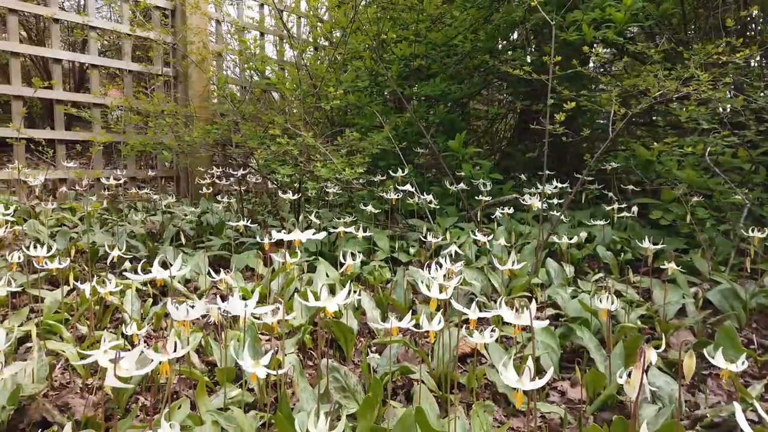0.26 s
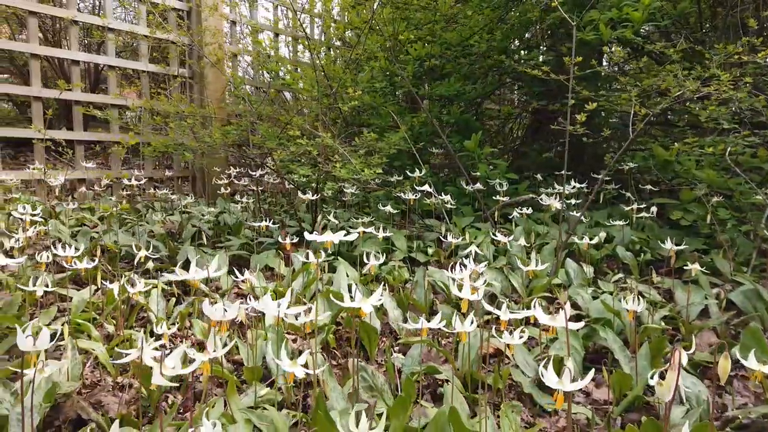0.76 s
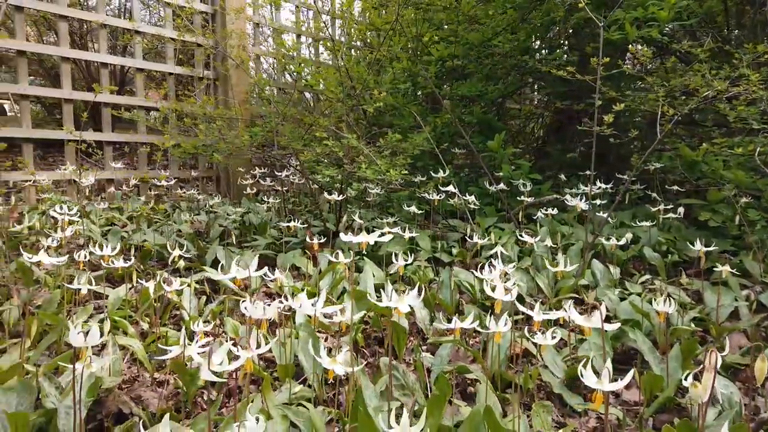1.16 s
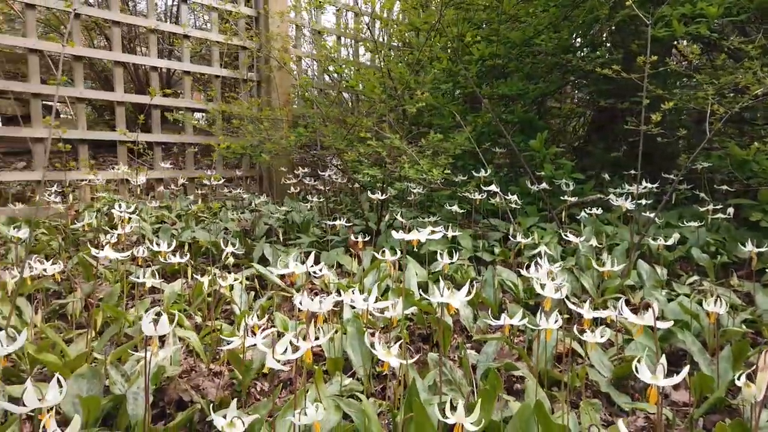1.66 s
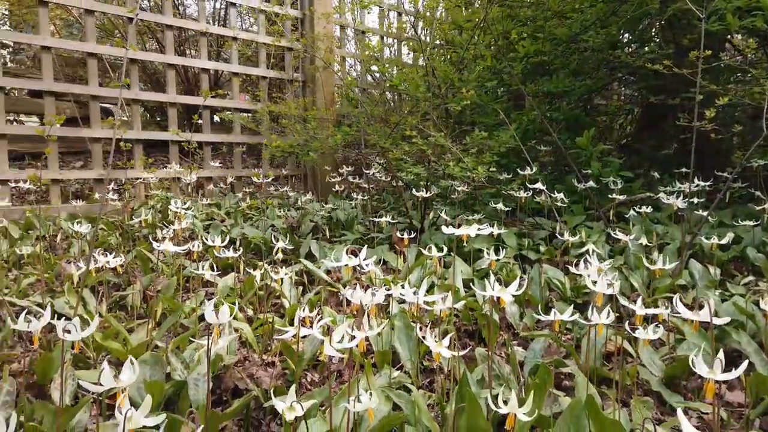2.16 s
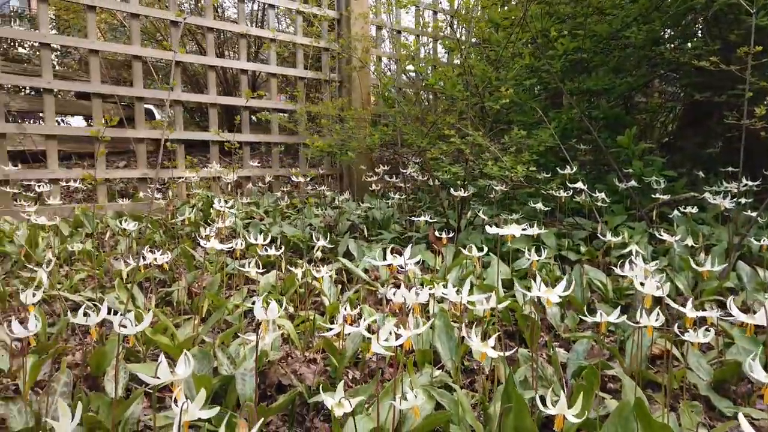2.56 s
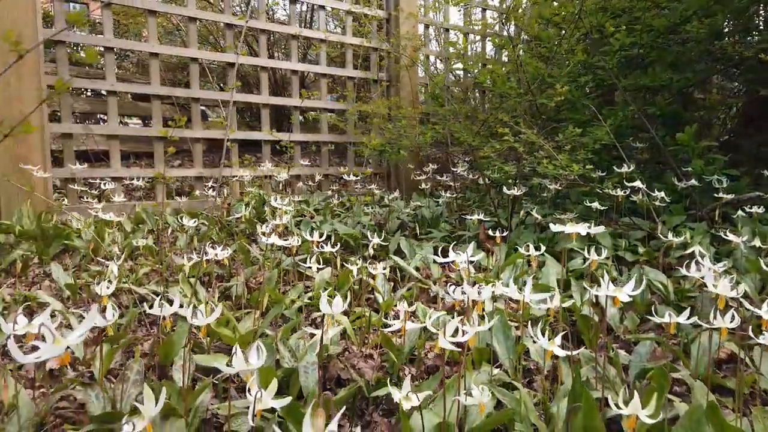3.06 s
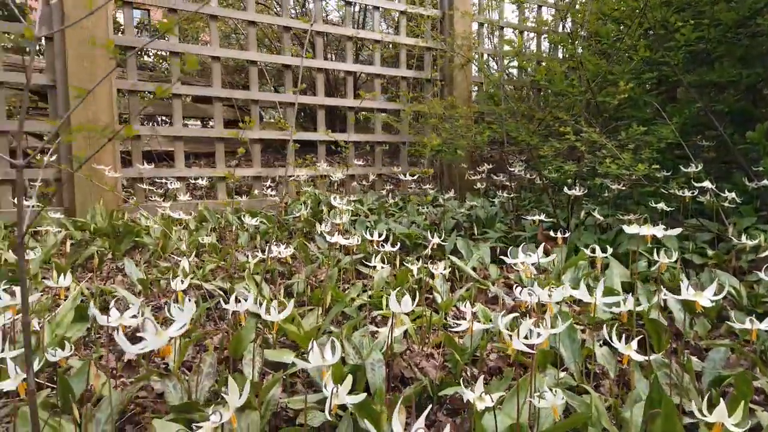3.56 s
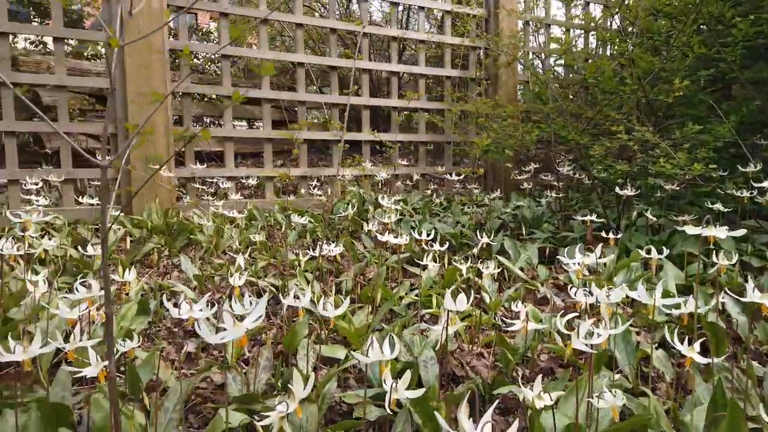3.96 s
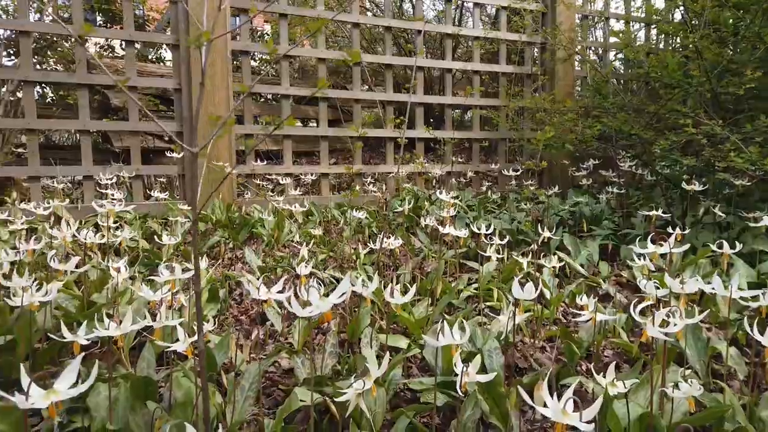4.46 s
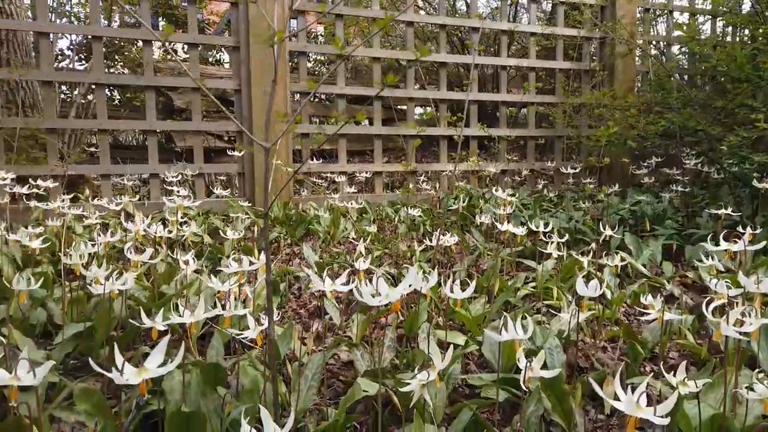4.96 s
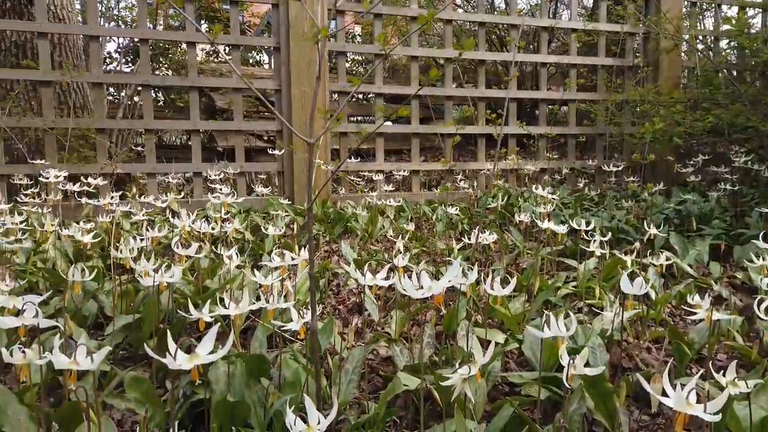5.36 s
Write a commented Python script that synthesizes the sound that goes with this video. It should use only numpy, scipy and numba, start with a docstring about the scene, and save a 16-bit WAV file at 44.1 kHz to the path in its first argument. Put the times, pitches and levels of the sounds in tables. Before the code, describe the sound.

A heavy engine drones nearer along a road beside a garden, its low rumble swelling and staying strong, with faint handling ticks at the end.

```python
"""Motors on a road

A heavy engine drones nearer along a road, slowly gaining revs: sines locked to one crank cycle.
A second motor hums, revs and drops out, and a shorter drone follows: gliding tones with rough noise edges.
Coloured noise makes the rumble, tyre roar, hiss and air; sliding noise bands make the swells and thuds.
High sizzle and squeaks (narrow noise bands) and taps (decaying sines) come from the hand-held recorder."""
import sys
import numpy as np
from scipy import signal
from scipy.fft import rfft, irfft, next_fast_len
from scipy.io import wavfile
from scipy.ndimage import uniform_filter1d, map_coordinates
from numba import njit

SR = 44100
rng = np.random.default_rng(int(sys.argv[2]) if len(sys.argv) > 2 else 0)


def transcribe(u):
    """Save the signal u as a 16-bit wav file named by the first command-line argument.

    u: samples, shape (n,) or (channels, n), limited to [-1, 1]; the rate is SR.
    q: integer samples, one column per channel.
    """
    v = np.clip(np.atleast_2d(u).T, -1, 1)
    q = np.round(v * 32767).astype(np.int16)
    wavfile.write(sys.argv[1], SR, q)


N = 247842
TIME = np.arange(N) / SR  # s
OPPOSITE = np.array([[1], [-1]])  # opposite signs in the left and right ports


def engine():
    """Harmonic synthesis: firing tone, octave, lope of uneven cylinders and overtones share one crank cycle."""
    # Each row: time in seconds, level of the firing tone in dB, level of the lope under it in dB.
    engine_levels = [(0, -49, -53.5), (.39, -42, -48), (.53, -32, -54), (.83, -37.5, -46),
                     (1.0, -28.5, -40), (1.2, -33.5, -43), (1.36, -29, -34), (1.6, -28, -36),
                     (1.9, -27.5, -35.5), (2.07, -31.5, -39), (2.35, -28, -34.5), (2.43, -22.5, -41.5),
                     (2.6, -26.5, -30.5), (3.14, -28, -37.5), (3.43, -33, -32), (3.61, -27, -29.5),
                     (3.94, -29.5, -32), (4.25, -21, -33), (4.41, -28, -31.5), (4.73, -32.5, -29.5),
                     (4.88, -26.5, -32.5), (5.21, -30, -25.5), (5.4, -32, -28), (5.62, -26, -32)]
    # Octave of the firing tone. Each row: time in seconds, level in dB.
    octave_levels = [(0, -71), (.85, -71), (1.1, -54.5), (1.5, -45.5), (2.2, -38), (3.0, -45), (3.5, -42),
                     (4.0, -38), (4.7, -41.5), (5.3, -35.5), (5.62, -37)]
    # Lines under the firing tone. Each row: multiple of the cycle rate, relative level at the start in dB,
    # rise in dB per second.
    lope_lines = [(4, -1.5, -2), (5, 0.5, -0.14), (6, -7, 1.07)]
    # Lines over the firing tone. Each row: multiple of the cycle rate, relative level at the start in dB,
    # rise in dB per second.
    overtone_lines = [(8, -5, 0), (9, -14.5, 3.5), (10, -11, -1.5), (11, -5, 0), (12, -10.5, 1.5),
                      (13, -13, 1.5), (15, -21, 1.5), (16, -9, .3), (18, -18.5, 2), (19, -10, 0),
                      (21, -15.5, .5), (23, -15.5, -0.5), (24, -18.5, -0.5)]
    firings_per_cycle = 7
    low_hz, high_hz, rev_mid_s, rev_span_s = 76.1, 85, 2.75, .72
    overtone_db = -40.5  # at the nearest point

    tone_db, lope_db = curves(engine_levels)
    # The firing rate climbs along an S-shaped curve.
    firing_hz = low_hz + (high_hz - low_hz) / (1 + np.exp((rev_mid_s - TIME) / rev_span_s))
    turns = np.cumsum(firing_hz / firings_per_cycle) / SR
    tone = undb(tone_db) * lines(turns, [(firings_per_cycle, 0)], waver_db=0.8, slip=0.3)
    octave = lines(turns, [(2 * firings_per_cycle, 0)], waver_db=1.0, slip=0.25)
    octave = undb(curves(octave_levels)[0]) * octave
    lope_rows = [(k, db + rise * TIME) for k, db, rise in lope_lines]
    lope = undb(lope_db) * lines(turns, lope_rows, waver_db=2.0, slip=0.043)
    over_rows = [(k, db + rise * TIME) for k, db, rise in overtone_lines]
    over = undb(overtone_db) * lines(turns, over_rows, waver_db=4.0, slip=0.76)
    return tone + lope + octave + undb(distance_db()) * over


def hum(table):
    """Frequency glide: a motor tone hugged by a band of noise follows the table's pitch, faded at both ends."""
    rough_db, rough_hz = -13, 22  # relative to the tone; width of each filter stage
    hz, db, unsteady_db = curves(table)
    fade = np.clip(np.minimum(TIME - table[0][0], table[-1][0] - TIME) / 0.023, 0, 1)
    rough = level(band(rng.standard_normal(N), hz, rough_hz), rough_db)
    tone = lines(np.cumsum(hz) / SR, [(1, 0)], waver_db=0.5, slip=0.22)
    return fade * undb(db + unsteady_db * walk(16)) * (tone + rough)


def lines(turns, table, waver_db, slip):
    """Additive synthesis: sines on multiples of a shaft angle waver in level and phase on the way through air."""
    total = 0
    for multiple, db in table:
        gain = np.sqrt(2) * undb(db + waver_db * walk(7))  # 0 dB is a sine of rms 1
        angle = 2 * np.pi * (round(multiple) * turns + rng.random())
        total = total + gain * np.sin(angle + slip * walk(5))
    return total


def distance_db():
    """Inverse distance law: level relative to the nearest point as the source draws up and then stays there."""
    start_m, closing_m_s, nearest_m = 49.4, 13.2, 31.3  # start is measured along the road
    along = np.maximum(start_m - closing_m_s * TIME, 0)
    return -20 * np.log10(np.hypot(along, nearest_m) / nearest_m)


def road():
    """Superposition: rumble, roar, hiss, throb, swells and thuds add as pressures."""
    noise, deep = pair(side_db=-25.0), pair(side_db=-40)
    return rumble_and_roar() + bright_hiss() + throb(deep) + swells(deep, noise) + thuds(deep)


def rumble_and_roar():
    """Spectral shaping: three colours of broadband noise stand for rumble, low roar and tyre roar."""
    # Each row: time in seconds, level of the rumble in dB, of the low roar in dB, of the tyre roar in dB.
    road_levels = [(0, -45.5, -57, -54.5), (.6, -41, -59.5, -53.5), (1.3, -38, -58, -52.5),
                   (2.1, -38.5, -58.5, -49.5), (2.6, -37.5, -58.5, -47.5), (2.95, -34.5, -57.5, -51.5),
                   (3.2, -38.5, -54.5, -49.5), (4.1, -35, -55, -47.5), (4.4, -34, -54.5, -50),
                   (5.0, -37, -59, -51), (5.62, -34, -59.5, -52.5)]
    # Each row: frequency in Hz, relative spectral level in dB; likewise for the two roars below.
    rumble_color = [(25, -8), (45, -9), (70, 3), (95, 3.5), (125, 4), (180, 1), (202, -2.5), (225, -3),
                    (260, -6.5), (280, -5), (330, -9.5), (380, -13), (430, -19), (700, -53.5)]
    # Each row: frequency in Hz, relative spectral level in dB.
    low_roar_color = [(260, -31), (350, -5.5), (420, 2), (550, 8.5), (700, 3.5), (850, -7.5), (1100, -29.5)]
    # Each row: frequency in Hz, relative spectral level in dB.
    tyre_color = [(500, -19), (700, -3.5), (850, 1.5), (1200, -1.5), (1500, -3.5), (2000, -8.5),
                  (2600, -23.5), (3400, -47)]
    rumble_db, low_db, tyre_db = curves(road_levels)
    rumble = wash(rumble_color, flicker_db=1.5, rate=7, patchy_db=2.5)
    rumble = undb(rumble_db + 1.04 * walk(8)) * rumble
    low_roar = undb(low_db) * wash(low_roar_color, flicker_db=1.3, rate=7, patchy_db=3.0)
    tyre_roar = undb(tyre_db) * wash(tyre_color, flicker_db=1.1, rate=7, patchy_db=2.0)
    return rumble + low_roar + tyre_roar


def bright_hiss():
    """Partial distance loss: the bright noise follows only a share, in dB, of the engine's approach."""
    # Each row: frequency in Hz, relative spectral level in dB.
    bright_color = [(1000, -27), (1600, -4), (2000, -7), (2500, -8), (3200, -14.5), (4000, -21),
                    (5000, -26), (7000, -35)]
    nearest_db, distance_share = -57, 0.65
    hiss_db = nearest_db + distance_share * distance_db() + 0.53 * walk(5)
    return undb(hiss_db) * wash(bright_color, flicker_db=1.4, rate=7.5, patchy_db=3.0)


def throb(deep):
    """Resonant filtering: a low band of noise grows by the inverse distance law."""
    nearest_db, center_hz, width_hz = -41.5, 43, 39.0
    return undb(distance_db()) * level(band(deep, center_hz + 0 * TIME, width_hz), nearest_db)


def swells(deep, noise):
    """Band-limited noise: narrow parts of the rumble and roar swell briefly."""
    # Each row: start in seconds, level in dB before window and flicker, start pitch in Hz, end pitch in Hz,
    # length in seconds.
    swell_rows = [(0.02, -40, 120, 117.4, 0.27), (0.494, -51, 290, 253, 0.41),
                  (1.298, -43, 185, 175.5, 0.5), (2.117, -40.5, 277, 252, 0.11),
                  (0.795, -46, 246, 204, 0.23), (1.5, -54.5, 331, 359, .9), (2.4, -53, 350, 340, 0.54),
                  (2.951, -49.5, 316, 337, 0.39), (3.363, -45, 167, 175, .15),
                  (4.3, -47, 289.6, 271.2, 0.24), (5.105, -55.5, 438, 440, 0.6),
                  (1.453, -59, 1650, 1650, 0.32), (3.023, -54.5, 905, 890, 0.087),
                  (3.78, -52.5, 1150, 1090, 0.12), (4.952, -57, 770, 745, 0.26),
                  (4.944, -39, 173, 173, 0.56), (5.102, -48.5, 219, 222, 0.4), (.1, -60, 834, 896, 0.8),
                  (3.254, -60.5, 1850, 1750, 0.62), (4.298, -61, 2110, 1900, 0.92),
                  (0.804, -59, 1390, 1400, 0.17), (1.05, -56, 920, 956, 0.64),
                  (1.456, -54.5, 1170, 1270, 0.23), (2.092, -53.5, 1280, 1325, 0.7),
                  (2.2, -56.5, 1740, 1870, 0.4), (2.302, -55, 1000, 855, 0.57),
                  (2.993, -55, 1690, 1770, 0.33), (2.999, -58, 1137, 960.5, 0.68),
                  (3.499, -56.5, 1320, 1470, 0.52), (4.0, -51.5, 1365, 1170, 0.93),
                  (4.596, -51.5, 1010, 997, 0.32)]
    bass_top_hz = 300  # bass swells starting under this are nearly the same in both ports
    width_share = 0.17  # filter width as a share of the start pitch
    total = 0
    for start, db, hz0, hz1, length in swell_rows:
        source = deep if hz0 < bass_top_hz else noise
        total = total + burst(source, start, db, hz0, hz1, width_share * hz0, length)
    return undb(1.9 * walk(13)) * total


def thuds(deep):
    """Band-limited noise: short windows on very low bands give deep thuds of air."""
    # Each row: start in seconds, level in dB before the window, start pitch in Hz, end pitch in Hz,
    # length in seconds.
    thud_rows = [(0.096, -44.5, 36, 44, 0.36), (.72, -40, 30, 30, 0.27), (1.1, -33, 49, 47.6, 0.3),
                 (2.452, -36.5, 45.7, 36, 0.47), (3.6, -38, 44.5, 45.4, 0.13), (3.78, -34, 44.5, 44, 0.18),
                 (4.001, -32, 43.7, 46.3, 0.347), (4.495, -35.5, 43.84, 44.07, 0.15),
                 (4.755, -31.5, 44, 47.2, 0.25), (5.412, -35.5, 45, 45, 0.23)]
    width_hz = 22
    return sum(burst(deep, s, db, hz0, hz1, width_hz, length) for s, db, hz0, hz1, length in thud_rows)


def sizzle():
    """Narrow-band noise: random level and pitch make a thin hiss flicker, with louder spurts."""
    # Each row: nominal time in seconds, nominal peak level in dB, frequency in Hz.
    spurt_rows = [(0.4589, -59, 10500), (0.7886, -65, 11100), (1.1034, -66, 10900), (1.6112, -61, 10700),
                  (2.2927, -60, 10400), (2.6303, -65, 10600), (3.3941, -66, 11000), (4.222, -65, 10500),
                  (4.678, -63, 11000)]
    center_hz, width_hz, steady_db = 10950, 900, -82
    spurt_s, lead_s = .04, .008  # length, and how far a spurt starts ahead of its nominal time
    crest_db = 13  # nominal peak of a spurt over its rms
    hz, noise = center_hz + 60 * walk(27), pair(side_db=-5.0)
    steady = level(band(noise, hz, width_hz), steady_db) * undb(3.2 * walk(25))
    spurts = sum(burst(noise, s - lead_s, db - crest_db, spurt_hz, spurt_hz, 900, spurt_s)
                 for s, db, spurt_hz in spurt_rows)
    return steady + spurts


def squeaks():
    """Narrow-band noise: a band far narrower than its pitch is heard as a short, rough, sliding whistle."""
    # Each row: start in seconds, level in dB before the window, start pitch in Hz, end pitch in Hz,
    # length in seconds.
    squeak_rows = [(.42, -80, 13000, 12500, .06), (.48, -83, 12200, 12000, .06),
                   (.64, -78, 13300, 13400, .07), (.77, -82, 12700, 13200, .07),
                   (.83, -77, 13600, 14600, .08), (2.888, -77, 13100, 13050, 0.074),
                   (2.977, -77, 13750, 13700, .07), (3.16, -81, 13200, 13100, .14),
                   (3.15, -77, 14680, 14300, 0.26), (3.29, -83, 12600, 12370, .12),
                   (3.38, -75, 14350, 14300, .05), (5.428, -69, 12500, 12800, 0.11),
                   (5.48, -71, 12950, 12900, .1), (5.544, -69.5, 12650, 12700, .08),
                   (5.42, -78, 10000, 9900, 0.11)]
    width_hz = 240
    noise = pair(side_db=4)
    return sum(burst(noise, s, db, hz0, hz1, width_hz, length) for s, db, hz0, hz1, length in squeak_rows)


def taps():
    """Damped free vibration: each tap rings the casing as a decaying sine, opposite in the two ports."""
    # Each row: start in seconds, envelope level at the start in dB, frequency in Hz,
    # time to decay by 60 dB in seconds.
    tap_rows = [(5.398, -40.5, 332, .04), (5.449, -39, 800, .008), (5.470, -45, 750, .012),
                (5.593, -36, 2200, 0.0035)]
    out = np.zeros(N)
    for s, db, hz, t60 in tap_rows:
        age = np.maximum(TIME - s, 0)
        out += undb(db - 60 * age / t60) * np.sin(2 * np.pi * hz * age)
    return out * np.array([[1], [-.6]])


def background_air():
    """Spectral shaping: faint wide-band noise drifts randomly in level."""
    # Each row: frequency in Hz, relative spectral level in dB.
    air_color = [(2000, -9.5), (3500, -9), (5000, -3.5), (6300, -6.5), (8000, -8.5), (10000, -7),
                 (12500, -9.5), (15000, -12), (16500, -17)]
    air_db = -71.5 + .9 * walk(9) + .7 * walk(3.3)
    return undb(air_db) * wash(air_color, flicker_db=1.6, rate=8, patchy_db=2.5)


def wash(points, flicker_db, rate, patchy_db):
    """Spectral shaping: stereo noise of rms 1 whose half-octave bands and small patches vary at random."""
    # Side relative to mid. Each row: frequency in Hz, level difference in dB.
    side_width = [(60, -44), (140, -44), (210, -38), (320, -27), (490, -17), (740, -14.5), (1130, -12.5),
                  (1710, -11), (2600, -6), (4500, -1.2), (9000, -.5), (15000, -1.5)]
    lead_share = .5  # part of the side, at low frequencies, that is the same sound reaching the left port first
    patch_hz, patch_s = 69.67, .12  # size of the small loud and quiet patches
    size = next_fast_len(N)
    hz = np.maximum(np.fft.rfftfreq(size, 1 / SR), 1)
    inside = (hz > points[0][0] / 1.3) & (hz < points[-1][0] * 1.3)
    own, other = inside * rfft(rng.standard_normal((2, size)))
    lead = lead_share * np.clip(1 - hz / 9000, 0, 1)
    color_db = on_log(points, hz)
    mid = own * undb(color_db)
    # The factor 1j advances the shared part by a quarter cycle; the power sum of the two parts stays 1.
    side = 1j * lead * own + np.sqrt(1 - lead ** 2) * other
    side = side * undb(color_db + on_log(side_width, hz))
    ports = irfft(np.array([mid + side, mid - side]), size)
    hz, s, cells = signal.stft(ports, SR, nperseg=2048)
    flicker = flicker_db * field(2 * np.log2(hz + 20), rate * s)
    patches = patchy_db * field(hz / patch_hz, s / patch_s)
    sound = signal.istft(cells * undb(flicker + patches), SR, nperseg=2048)[1]
    return level(sound[:, :N], 0)


def burst(noise, start, db, hz0, hz1, width, length):
    """Amplitude windowing: a half-sine shapes a steep sliding noise band, set to its rms before the window."""
    out, first = np.zeros(noise.shape), int(start * SR)
    part = noise[:, first:first + int(length * SR)]
    place = np.linspace(0, 1, part.shape[1])
    hz = hz0 + (hz1 - hz0) * place
    sliding = level(band(part, hz, width), db)
    out[:, first:first + len(place)] = sliding * np.sin(np.pi * place)
    return out


def pair(side_db):
    """Mid-side stereo: white noise for two ports, with a share of opposite sign between them."""
    mid, side = rng.standard_normal((2, N))
    return mid + undb(side_db) * side * OPPOSITE


def band(x, hz, width):
    """Cascaded resonance: two equal band-pass stages on each port steepen the skirts."""
    rows = [svf(svf(row, hz, width), hz, width) for row in np.atleast_2d(x)]
    return np.array(rows).reshape(x.shape)


@njit
def svf(x, hz, width):
    """Two-pole resonance: a state-variable band-pass with moving centre and gain 1 there."""
    y, band_state, low_state = np.empty(len(x)), 0., 0.
    for i in range(len(x)):
        g, damping = np.tan(np.pi * hz[i] / SR), width / hz[i]
        v = (band_state + g * (x[i] - low_state)) / (1 + g * (g + damping))
        band_state = 2 * v - band_state
        low_state = low_state + 2 * g * v
        y[i] = damping * v
    return y


def walk(rate):
    """Smoothed randomness: values held 1 / rate s, then averaged twice over that time; spread near 0.7."""
    k = int(SR / rate)
    held = np.repeat(rng.standard_normal(N // k + 1), k)
    return uniform_filter1d(uniform_filter1d(held, k), k)[:N]


def field(rows, columns):
    """Random field: a grid of chance values is read linearly at fractional places."""
    grid = rng.standard_normal((int(rows.max()) + 2, int(columns.max()) + 2))
    places = np.meshgrid(rows - rows.min(), columns, indexing="ij")
    return map_coordinates(grid, places, order=1)


def curves(table):
    """Linear interpolation: table columns joined by straight lines in time, with corners rounded."""
    s, *columns = np.transpose(table)
    return [uniform_filter1d(np.interp(TIME, s, c), size=800) for c in columns]


def on_log(points, hz):
    """Logarithmic frequency: a spectrum in dB is read along straight lines over log frequency."""
    p = np.array(points, float)
    return np.interp(np.log(hz), np.log(p[:, 0]), p[:, 1])


def undb(db):
    """Decibel definition: amplitude gain from dB."""
    return 10 ** (np.asarray(db) / 20)


def level(x, db):
    """Root-mean-square measure: scale to an rms level in dB."""
    return x * undb(db) / np.sqrt(np.mean(x ** 2))


def scene():
    """Superposition: motors in the middle, with a faint delayed side copy, add to the road and air."""
    # Second motor. Each row: time in seconds, pitch in Hz, level in dB, unsteadiness in dB.
    second_motor = [(1.7, 132.6, -43, 2), (2.2, 135.5, -39, 7), (2.45, 133.8, -33.5, -2.5),
                    (2.56, 126.6, -35.5, 1), (2.68, 122.2, -34.5, 2.5), (2.78, 116, -52, 1),
                    (2.84, 111.2, -28.5, -0.5), (3.03, 111.5, -26, 4.5), (3.2, 110.6, -28.5, -1),
                    (3.33, 110.8, -28.5, 5), (3.45, 112.4, -33, 2), (3.56, 116.3, -27.5, 4),
                    (3.67, 109.3, -27.5, -0.5), (3.8, 113.5, -22, -1.5), (3.87, 121.5, -21.5, 5.5),
                    (3.93, 128.9, -29, 8), (3.98, 140.8, -32, 1), (4.04, 137.1, -29.5, -1),
                    (4.12, 139.6, -28.5, 8), (4.26, 137, -28.5, 0.5), (4.4, 137.4, -29, 3.5),
                    (4.47, 137.8, -22, 1.5), (4.54, 135.8, -32.5, 3), (4.66, 135, -41, 2)]
    # Third, shorter drone. Each row: time in seconds, pitch in Hz, level in dB, unsteadiness in dB.
    late_drone = [(4.9, 102.9, -33.5, 4), (5.2, 101.2, -33.5, 5.5), (5.62, 101.6, -43, 9)]
    motors = engine() + hum(second_motor) + hum(late_drone)
    side_db, delay_samples = -48, 150
    motors = motors + undb(side_db) * np.roll(motors, delay_samples) * OPPOSITE
    return motors + road() + background_air() + sizzle() + squeaks() + taps()


def record(dry):
    """Low-pass filtering: the recorder cuts the top with a steep elliptic filter."""
    top_hz = 15700
    return signal.sosfilt(signal.ellip(10, .2, 60, top_hz, fs=SR, output="sos"), dry)


dry = scene()
out = record(dry)
transcribe(out)
```